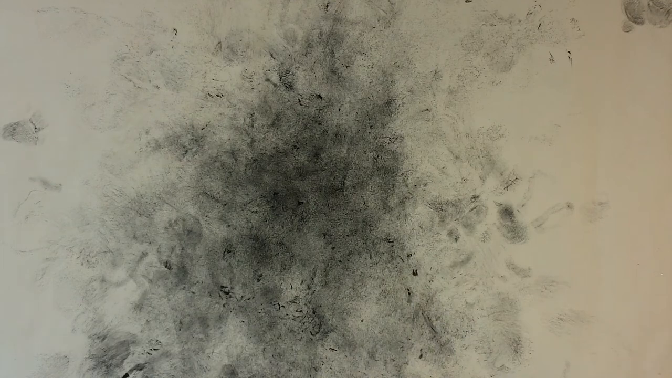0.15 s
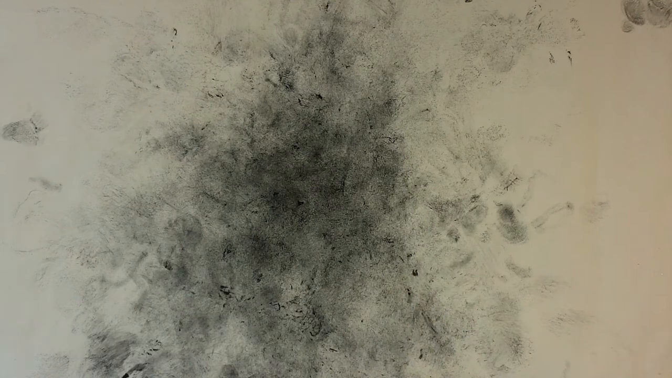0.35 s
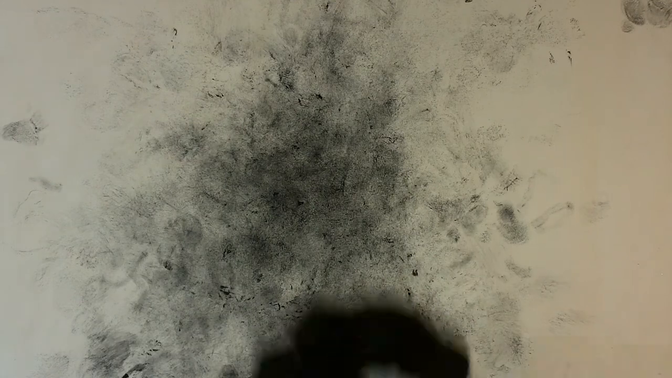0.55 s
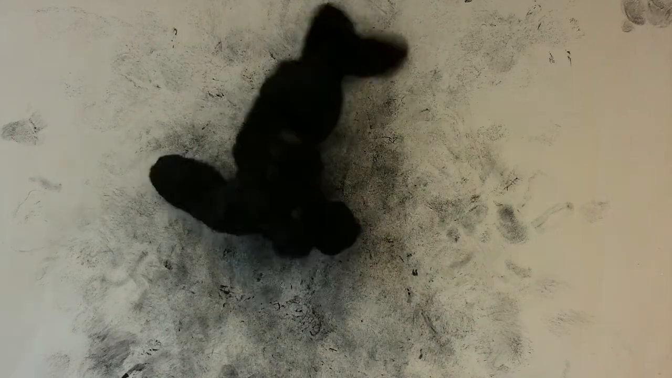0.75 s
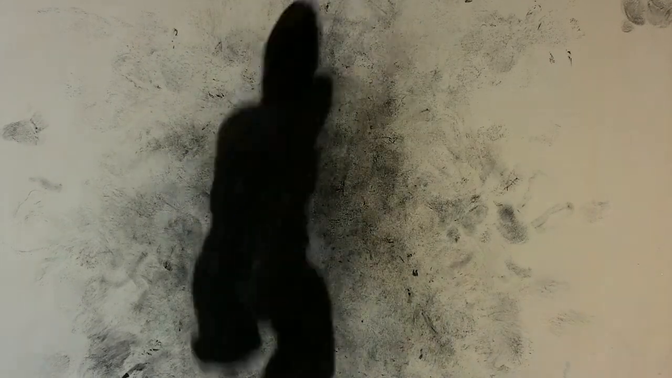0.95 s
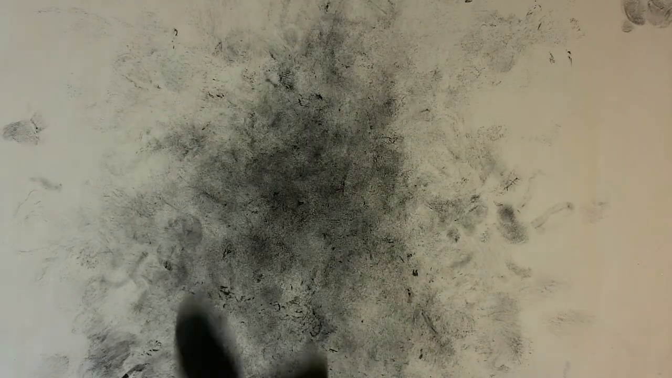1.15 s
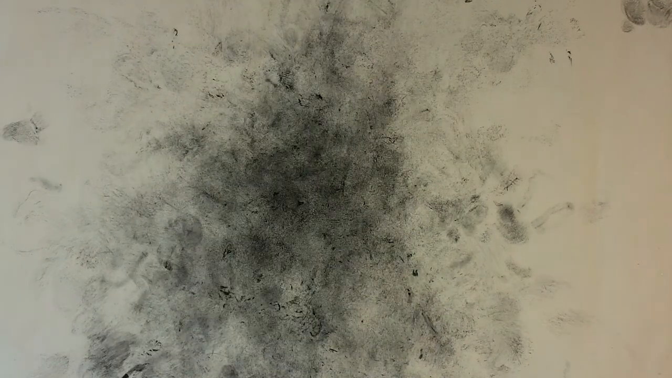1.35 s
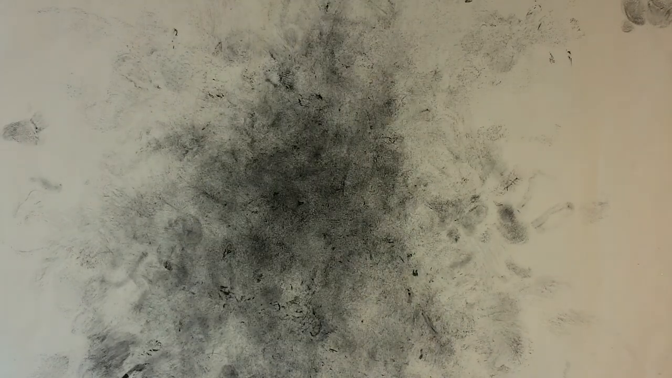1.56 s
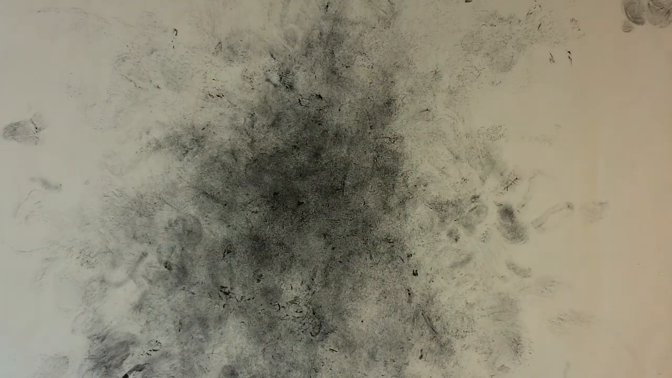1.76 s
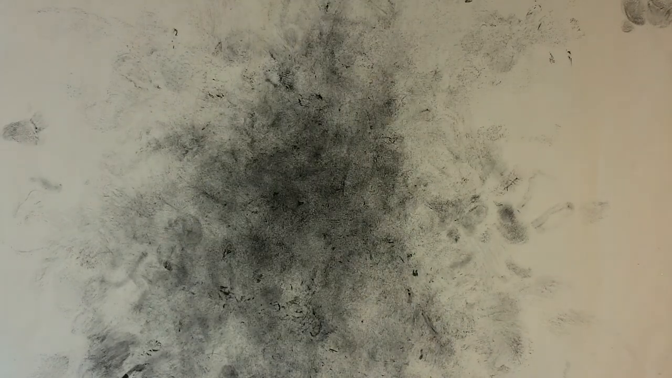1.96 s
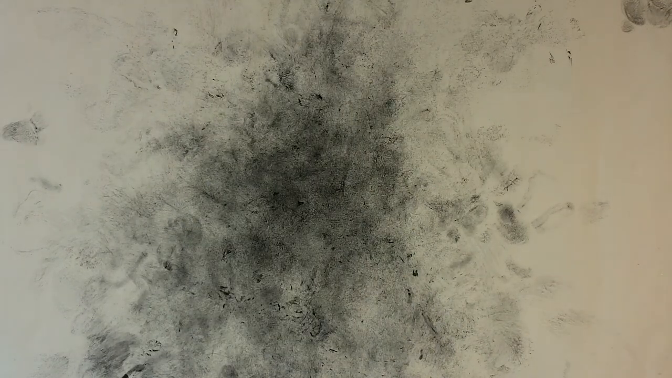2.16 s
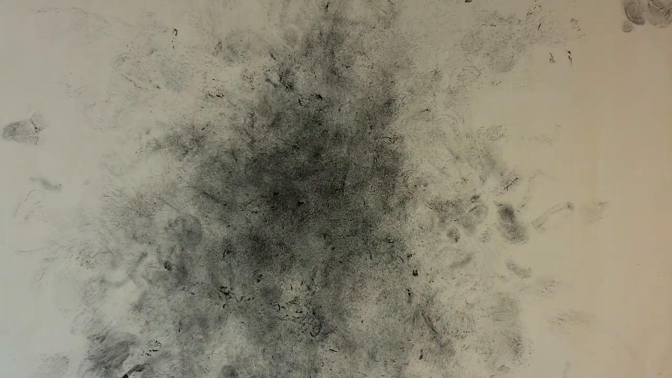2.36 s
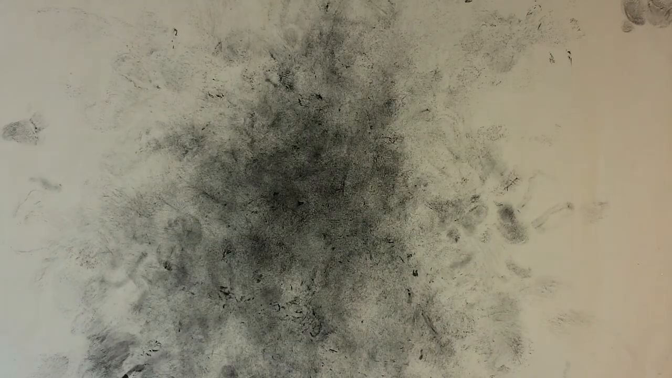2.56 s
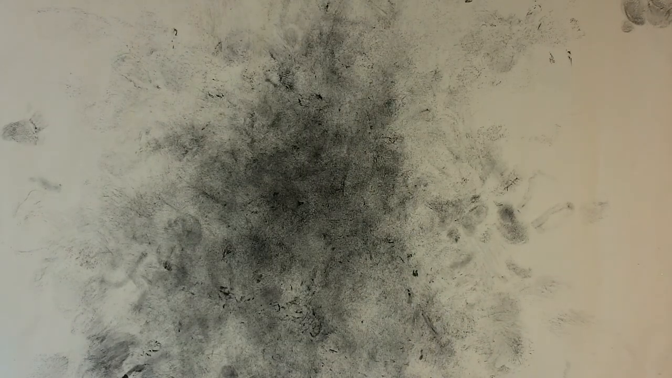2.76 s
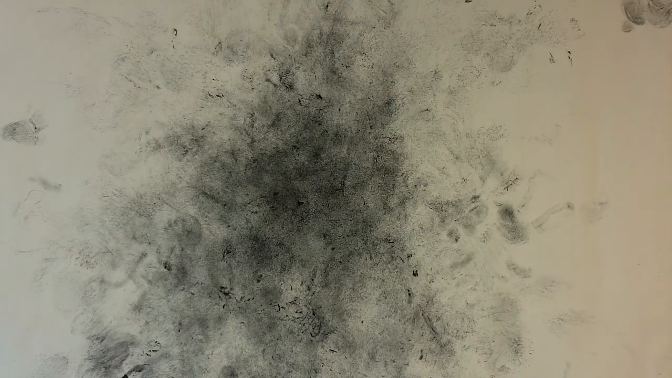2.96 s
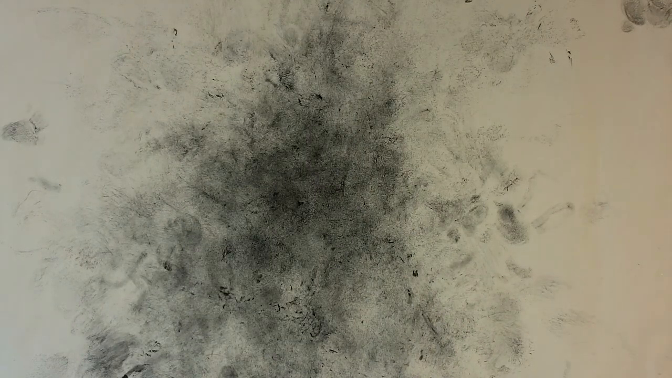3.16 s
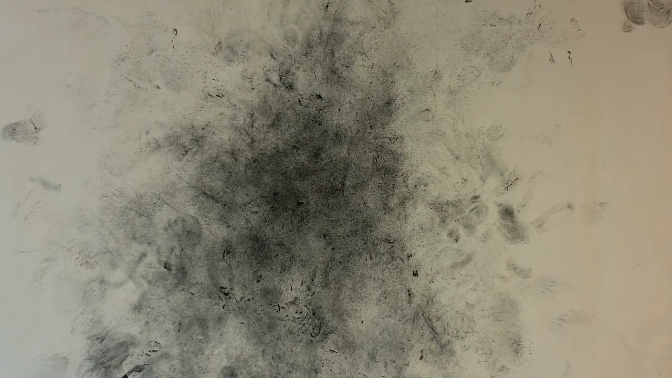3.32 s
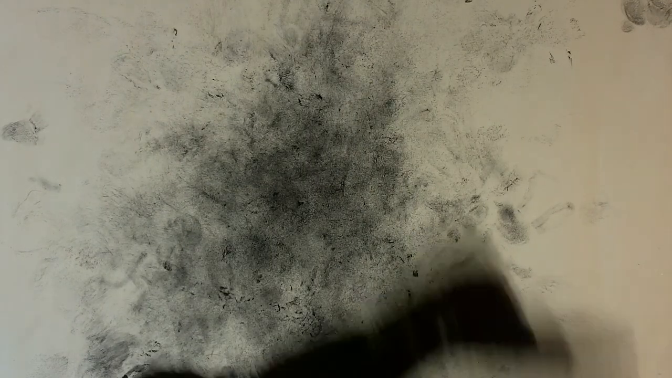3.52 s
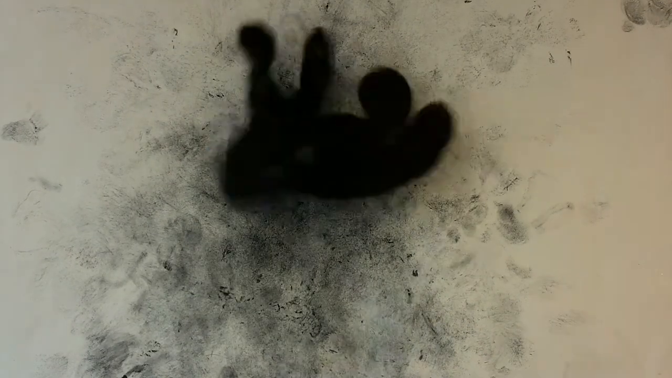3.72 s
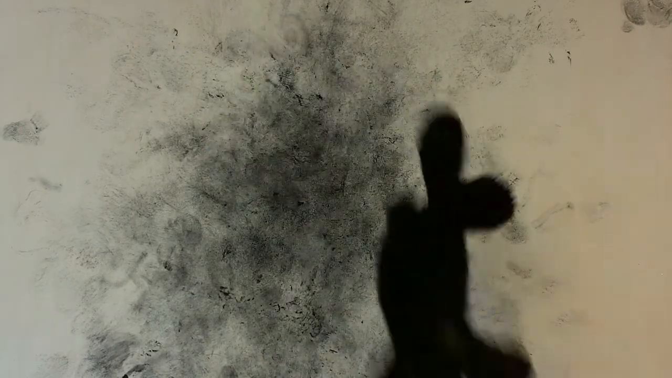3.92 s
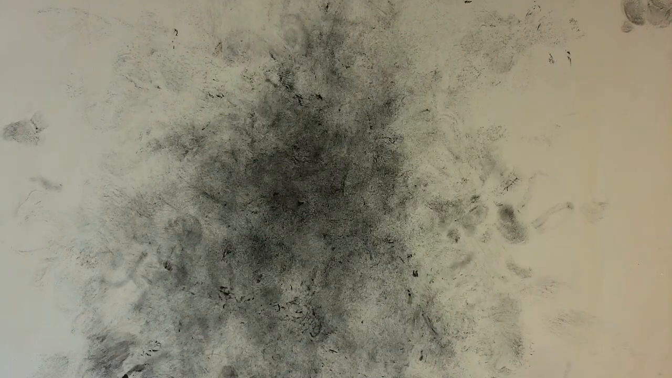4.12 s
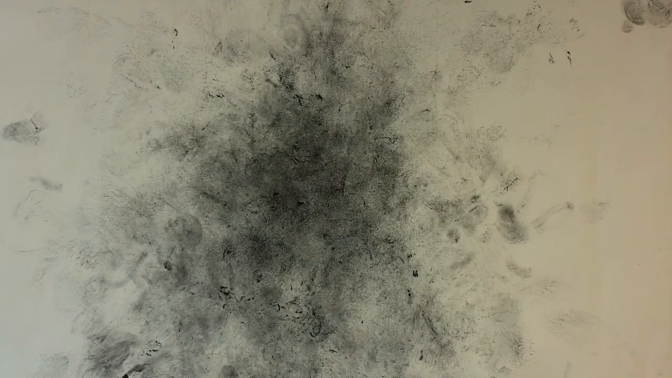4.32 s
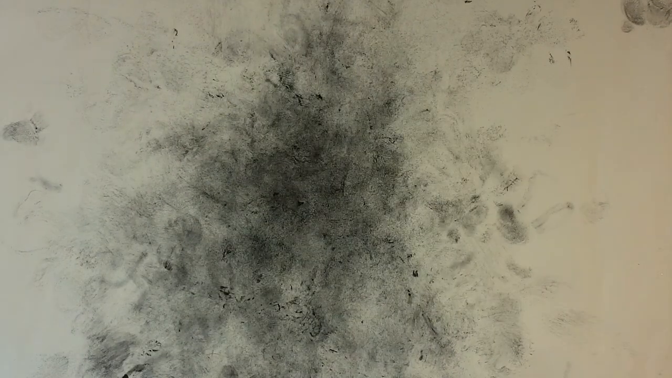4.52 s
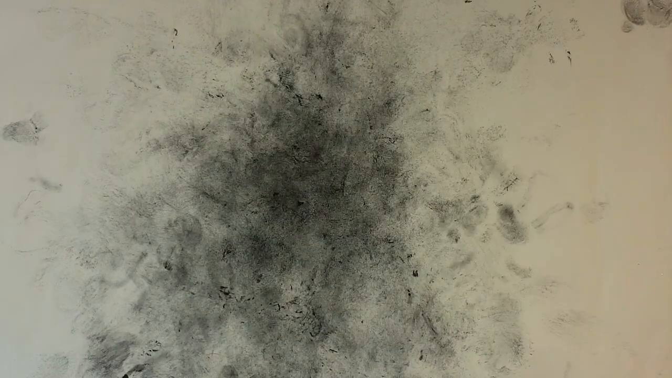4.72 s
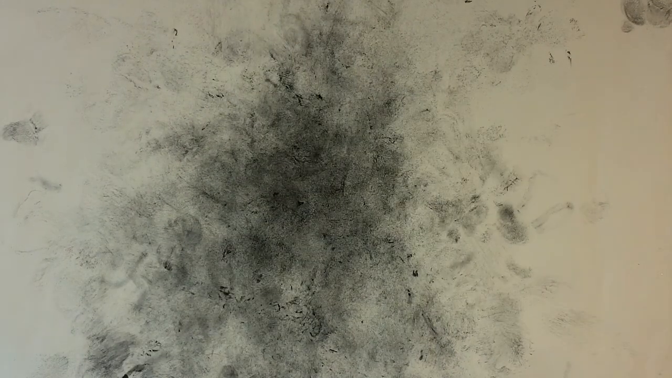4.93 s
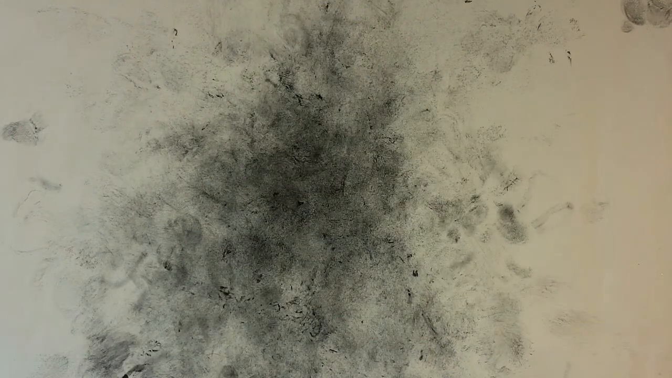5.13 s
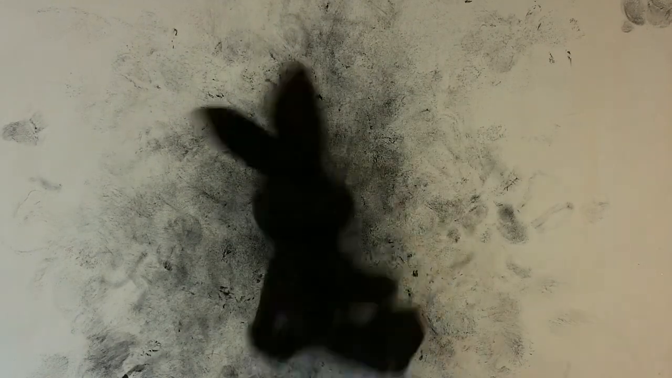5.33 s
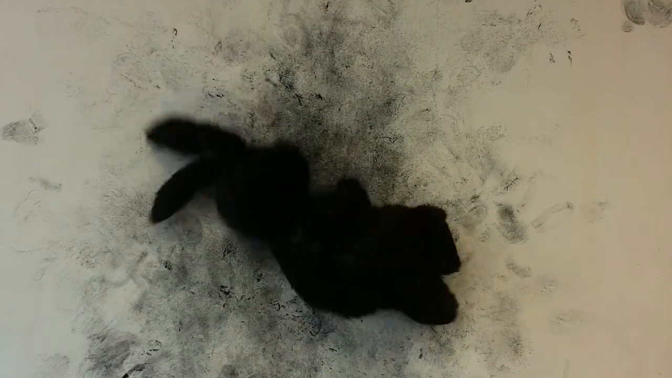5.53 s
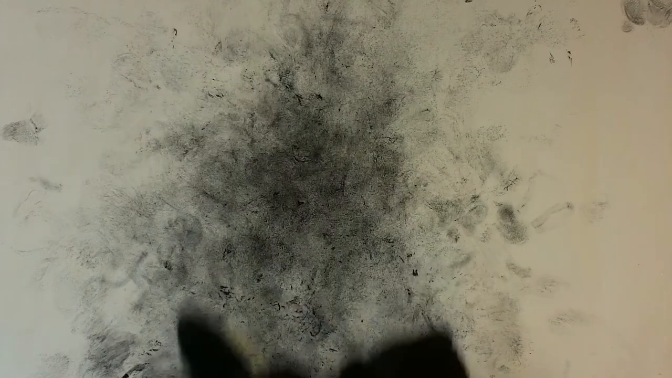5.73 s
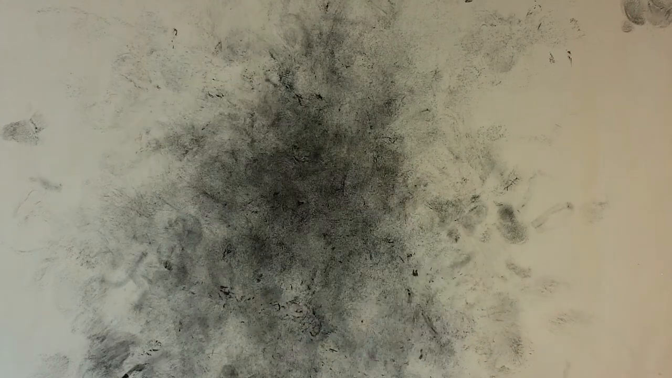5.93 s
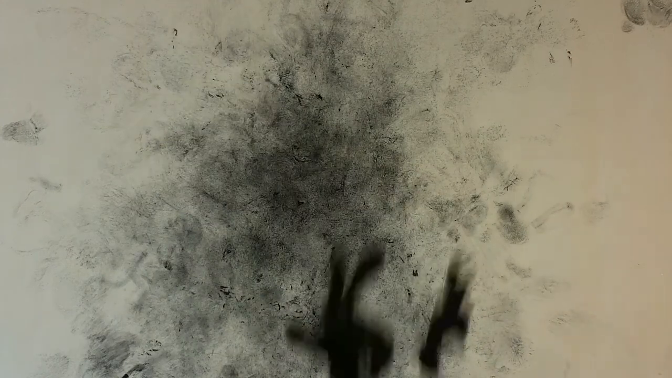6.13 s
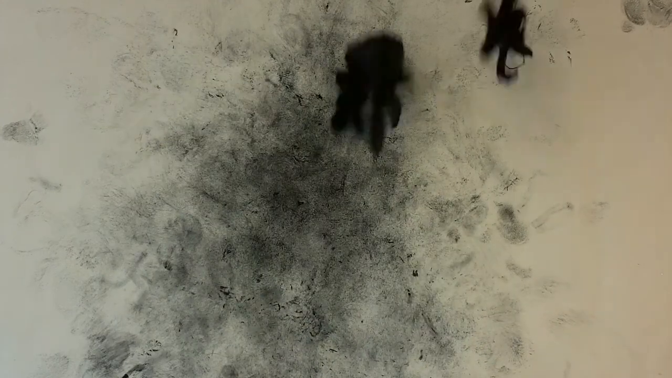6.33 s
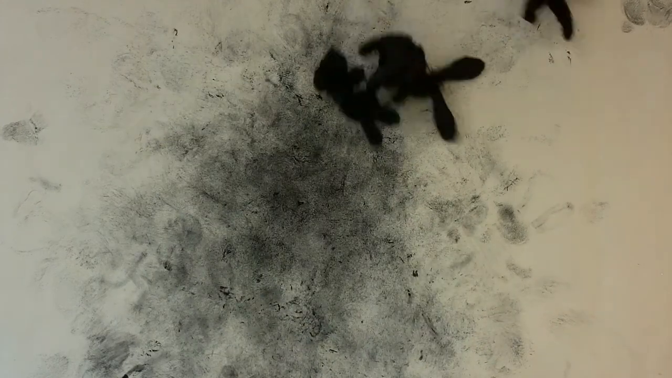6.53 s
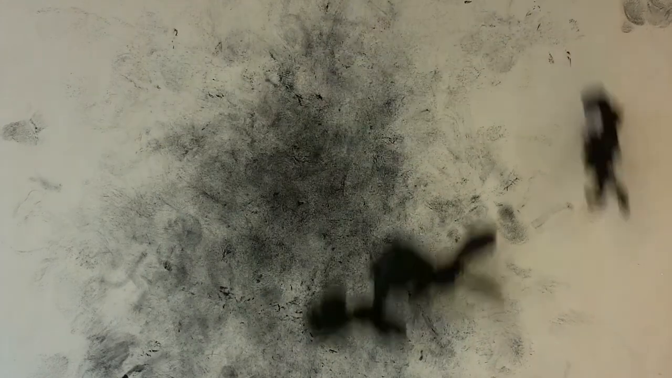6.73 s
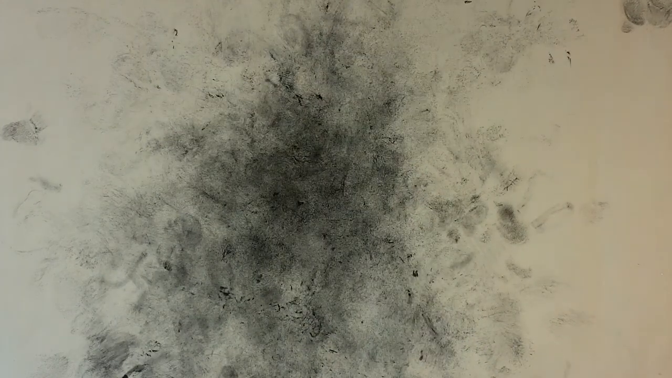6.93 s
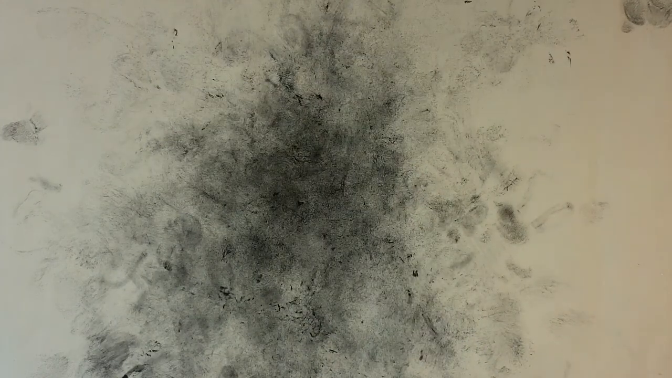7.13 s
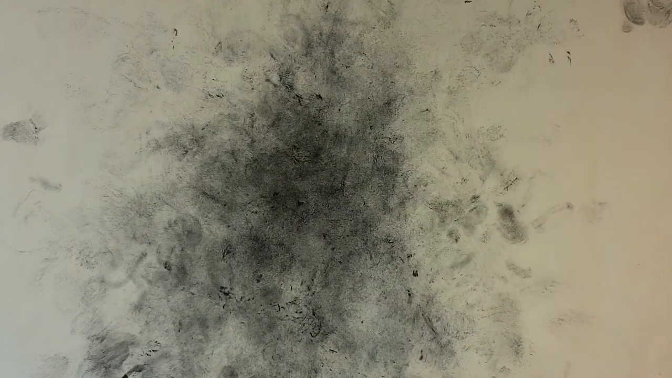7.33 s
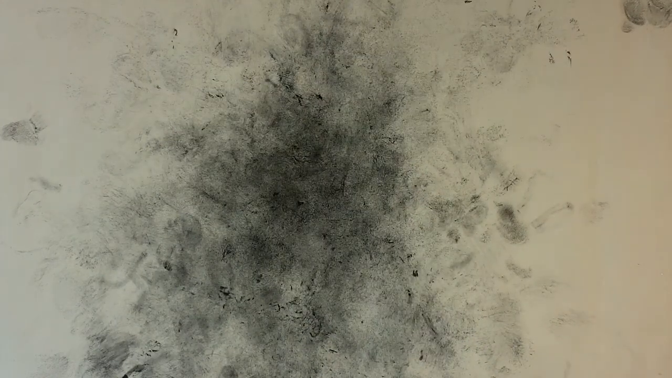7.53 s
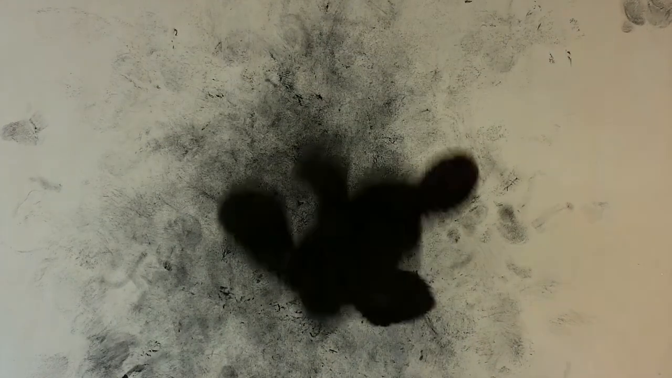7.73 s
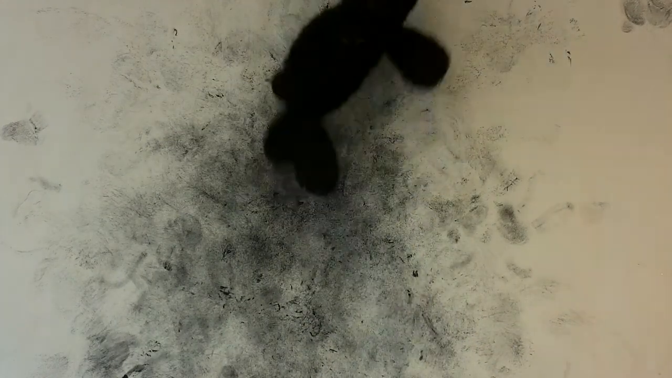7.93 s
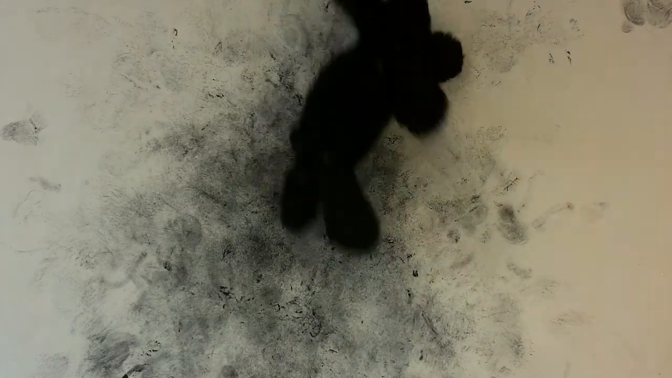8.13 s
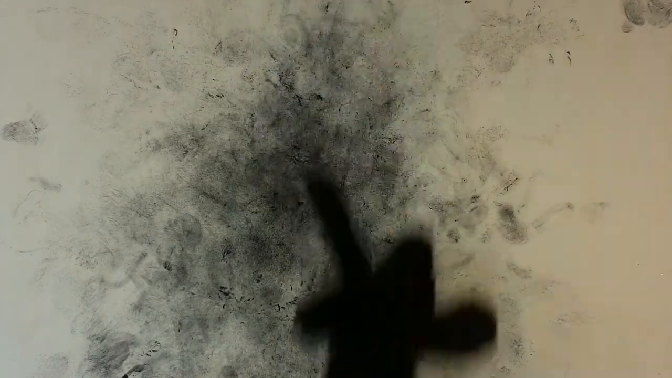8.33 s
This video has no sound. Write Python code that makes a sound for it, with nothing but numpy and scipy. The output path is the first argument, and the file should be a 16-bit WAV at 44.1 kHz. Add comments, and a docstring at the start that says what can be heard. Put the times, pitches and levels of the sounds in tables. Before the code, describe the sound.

A light bump and scuff on paper open the scene. From about 0.5 to 0.9 seconds, a plush toy brushes and lands on a big sheet on a hard floor, with dull slaps and crackles. Faint furry scuffs and paper ticks follow until a sharp paper snap at 3.3 seconds. The loudest landing comes at 3.8 seconds, a quick flurry of soft slaps, thuds and crackling. Another toy lands at 5.5 seconds with a hollow bump, followed by a snap. Lighter landings and snaps cluster around 6.5 seconds. From 7 to 7.6 seconds, fur drags across the sheet, which buckles with snaps, bumps and brief squeaky scuffs. A last toy flops down at about 8.1 seconds and slides. Everything has the short echo of a small bare room, over a steady low rumble and faint microphone hiss.

```python
"""Dull, soft slaps and crackling paper: plush toy rabbits are tossed one after another onto a big sheet
on a hard floor, and dragged off again. Each lands limb by limb, its weight thudding under the slap.
Fur scuffs across the sheet, which snaps as it buckles and resonates briefly in hollow bumps and squeaks.
A small bare room answers, over a low rumble and the hiss of a small microphone."""
import sys
import numpy as np
from scipy import signal
from scipy.fft import rfft, irfft
from scipy.io import wavfile

SR = 44100
rng = np.random.default_rng(int(sys.argv[2]) if len(sys.argv) > 2 else 0)


def waveform_to_disk(signal):
    """Save audio, clipped to [-1, 1], as 16-bit WAV at the path in sys.argv[1]."""
    frames = np.transpose(np.atleast_2d(signal))
    scaled = np.clip(frames, -1, 1) * 32767
    samples = np.round(scaled).astype(np.int16)
    wavfile.write(sys.argv[1], SR, samples)


N = 369356
TIME = np.arange(N) / SR

# Cue lists; their levels are relative, ahead of the trims in scene().
# fur slides on paper: start_s, speed_up_s, slow_down_s, rub_db, drag_db
FUR_STROKES = [(0.0, 0.0017, 0.096, -36, -43), (0.04, 0.11, 0.13, -43.5, -54), (0.484, .005, .06, -28, -39),
               (0.49, 0.055, 0.086, -25.5, -38), (0.788, 0.038, .12, -31, -26.5),
               (1.0, 0.098, 0.15, -60, -56.5), (1.425, .01, 0.057, -61, -50.5),
               (1.48, 0.068, 0.061, -50, -48.5), (1.65, 0.045, 0.036, -47.5, -49),
               (1.85, 0.033, .04, -53, -68), (1.93, .11, .13, -45.5, -48), (2.13, 0.017, 0.1, -46, -58),
               (2.29, .01, .14, -56, -59), (2.43, 0.062, 0.066, -47, -45.5), (2.68, 0.065, 0.037, -49, -60),
               (3.4, 0.087, 0.18, -55, -57), (3.61, 0.082, 0.056, -43, -48.5),
               (3.88, 0.014, 0.11, -39.5, -41.5), (4.1, 0.12, 0.15, -55, -55),
               (4.359, 0.029, 0.026, -50, -41), (5.15, 0.015, 0.14, -51, -59), (5.3, 0.033, 0.11, -55, -61),
               (5.58, 0.023, 0.11, -42.5, -36.5), (5.68, 0.017, 0.12, -44, -55),
               (5.8, 0.22, .12, -54.5, -55.5), (6.06, 0.092, 0.14, -43, -45.5),
               (6.3, 0.076, 0.051, -48.5, -53), (6.441, 0.017, 0.081, -29.5, -32),
               (6.53, 0.044, 0.057, -33, -36), (6.6, 0.076, 0.038, -38, -63),
               (7.089, 0.035, 0.078, -41, -44.5), (7.18, 0.056, .15, -39.5, -37),
               (7.29, 0.2, 0.076, -31.5, -41), (7.575, 0.01, 0.061, -39.5, -42.5),
               (7.955, .02, 0.085, -38.5, -47.5), (8.17, 0.086, .3, -41, -40.5)]
# the sheet sounds briefly at one pitch: peak_s, pitch_hz, level_db
SHEET_RESONANCES = [(0.553, 477, -35.5), (0.847, 910, -30), (1.444, 467, -49.5), (1.693, 456, -47.5),
                    (2.0, 480, -45.5), (2.301, 460, -52.5), (3.296, 433, -44.5), (5.557, 227, -34),
                    (5.56, 940, -29), (6.579, 1870, -29), (7.152, 550, -42.5), (7.177, 285, -39.5),
                    (7.315, 1160, -35.5), (7.372, 1600, -36), (7.426, 1100, -36), (7.486, 520, -35.5),
                    (7.584, 3190, -31.5), (7.968, 1560, -40.5), (8.066, 910, -29), (8.124, 780, -33)]
# the sheet snaps or is tapped: start_s, snap_db, knock_db, crisp_db
PAPER_SNAPS = [(0.041, -32.5, -42.5, -53), (0.4842, -31, -36, -67), (0.717, -33.5, -46, -68),
               (0.794, -35, -48, -51), (0.901, -33.5, -34, -56), (1.074, -39.5, -52, -64),
               (1.429, -43.5, -64, -78), (1.7268, -39, -63, -64), (2.7446, -42, -54, -76),
               (3.0465, -45.5, -49.5, -79), (3.2802, -15, -36, -40), (3.45, -54, -51, -78),
               (3.779, -29, -40, -53), (4.18, -56, -64, -68), (4.394, -41, -51, -59.5),
               (5.058, -52, -52, -79), (5.4138, -39, -52, -77), (5.692, -24, -31.5, -55),
               (6.442, -22.5, -31.5, -46), (6.5299, -27.5, -36, -51), (6.5748, -28, -31.5, -60),
               (6.662, -41, -42, -61), (7.075, -52, -48, -78), (7.154, -27.5, -38, -65),
               (7.171, -39, -44, -65), (7.2459, -35, -34.5, -72), (7.376, -31, -38, -61),
               (7.425, -38, -49, -60), (7.488, -26, -29, -61), (7.831, -44.5, -67, -70),
               (7.957, -53, -50, -72), (8.138, -33, -40, -51)]
# a body or limb lands: start_s, slap_db, thud_db, crackle_db
TOY_LANDINGS = [(0.002, -38, -36, -62), (0.546, -28.5, -29.5, -50), (0.778, -29, -35, -32.5),
                (0.783, -22.5, -48, -45), (0.806, -27, -48, -34), (0.873, -25.5, -33, -47),
                (0.917, -30.5, -38, -50), (3.773, -11, -28.5, -10.5), (3.786, -12, -28, -23),
                (3.795, -15, -20.5, -17.5), (3.805, -10, -34, -30), (3.828, -18, -20, -23),
                (3.842, -17.5, -33, -14.5), (3.859, -17, -22.5, -25), (3.878, -19, -36, -21.5),
                (5.497, -34.5, -58, -35), (5.512, -21, -28, -42), (5.521, -15.5, -36, -36),
                (5.529, -16, -41, -27.5), (5.557, -21.5, -27, -29), (6.438, -26.5, -42, -28),
                (6.461, -33.5, -29.5, -46), (6.548, -25, -33.5, -29), (6.574, -25, -29, -32),
                (8.041, -26.5, -31.5, -30.5), (8.061, -24.5, -33, -35), (8.096, -23.5, -26.5, -22.5),
                (8.126, -25.5, -27.5, -32)]

# Tone curves, one for each layer: frequency_hz, relative_gain_db
RUMBLE_EQ = [(15, 2), (40, 0.5), (62, 0.5), (80, -2.5), (97, 0.5), (125, -10.5), (170, -5.5), (215, -8),
             (245, -12), (275, -23), (320, -17), (450, -26), (1000, -34), (3000, -54)]     # the building's low end
HISS_EQ = [(300, 2.5), (1000, -4), (3300, 1), (4800, 6.5), (5300, -3.5), (8000, -19), (15000, -15.5)]         # microphone self-noise
RUB_EQ = [(300, -23), (1200, -11.5), (2100, -1.5), (3300, 2), (4800, 4), (5200, -4), (6500, -12),
          (8000, -27.5), (9700, -24), (11500, -22.5), (15000, -40)]           # bright brush of fibres
DRAG_EQ = [(100, -13.5), (200, 1), (280, 4), (350, -1.5), (460, -1), (700, -1.5), (1050, -5), (1600, -6.5),
           (3000, -15.5), (8000, -42.5)]         # dull pull of the toy's weight
SNAP_EQ = [(300, -8.5), (1500, -16), (3000, 1), (4700, 10), (5300, -1.5), (6600, -6), (8000, -18),
           (9700, -29), (11500, -22), (15000, -39)]         # paper buckling
CRISP_EQ = [(2000, -33), (5000, 9), (7000, 16), (11500, 7), (15000, -17)]       # the snap's airy edge
KNOCK_EQ = [(80, -33), (250, 2), (450, -7.5), (700, 1), (1100, 4), (2000, 5), (3000, 4.5), (5000, -36),
            (15000, -68)]       # paper tapping the floor
SLAP_EQ = [(100, -23), (300, -12.5), (480, -5), (620, -5), (800, -1.5), (1050, 0.5), (1400, -1),
           (2100, -4.5), (3000, -10.5), (5000, -19.5), (8000, -52), (15000, -60)]         # midrange smack of plush
THUD_EQ = [(50, -9), (130, -8.5), (195, -8), (270, -2.5), (340, -5.5), (450, -5.5), (600, -3), (900, -25.5),
           (2000, -35), (8000, -69)]         # the weight coming down
CRACKLE_EQ = [(400, -51.5), (1300, -8.5), (2200, 6), (3200, 5), (4700, 5.5), (5100, -5), (6500, -12.5),
              (8000, -31.5), (9700, -26.5), (11500, -27), (15000, -40)]   # paper creasing under a toy

# the room's decay: frequency_hz, t60_s
ROOM_DECAY = [(150, 0.55), (500, 0.36), (1200, 0.35), (3000, 0.43), (6000, 0.37), (14000, 0.34)]
# narrow dips in the microphone's response: centre_hz, width_hz
MIC_NOTCHES = [(4200, 910), (7870, 1020), (8800, 790), (12600, 510)]


def from_db(db):
    """Decibels to gain."""
    return 10 ** (np.asarray(db) / 20)


def at_hz(curve, hz):
    """Read a curve along a log-frequency axis."""
    knots, values = np.transpose(curve)
    return np.interp(np.log(np.maximum(hz, 1)), np.log(knots), values)


def colour(x, eq, size=8192):
    """Minimum-phase EQ: nothing rings ahead of an attack, and white noise keeps its power."""
    bins_hz = np.arange(size // 2 + 1) * SR / size
    cepstrum = irfft(np.log(from_db(at_hz(eq, bins_hz))))
    cepstrum[1:size // 2] *= 2
    cepstrum[size // 2 + 1:] = 0
    response = irfft(np.exp(rfft(cepstrum)))[:size // 2]
    return signal.fftconvolve(x, response / np.linalg.norm(response))[:N]


def grains(per_s, spread_db):
    """Gritty texture: tiny contacts at random moments and of uneven size; rms 1."""
    sizes = from_db(spread_db * np.minimum(rng.exponential(1, N), 4))
    clicks = (rng.random(N) < per_s / SR) * sizes * rng.choice([-1, 1], N)
    return clicks / np.sqrt(np.mean(clicks ** 2))


def blows(starts_s, levels_db, decay_s):
    """Envelope of a series of blows: instant attack, exponential decay; their powers add."""
    power = np.zeros(N)
    for start_s, level_db in zip(starts_s, levels_db):
        start = round(start_s * SR)
        age = TIME[:min(SR // 3, N - start)]
        power[start:start + len(age)] += (from_db(level_db) * np.exp(-age / decay_s)) ** 2
    return np.sqrt(power)


def background(rumble_db, hiss_db):
    """The bed: the building rumbles in the room's low resonances, and the microphone hisses."""
    rumble, hiss = rng.standard_normal((2, N))
    return from_db(rumble_db) * colour(rumble, RUMBLE_EQ) + from_db(hiss_db) * colour(hiss, HISS_EQ)


def room(x, wet_db, first_echo_s, early_db, early_s, place_s, places=7):
    """Dense echoes off near walls; their pattern shifts as the toys move from place to place."""
    age = TIME[:SR * 3 // 4]
    tails = 0
    for hz in 110 * 2. ** np.arange(8):
        octave = signal.butter(2, [hz / np.sqrt(2), hz * np.sqrt(2)], "band", fs=SR, output="sos")
        wash = signal.sosfilt(octave, rng.standard_normal((places, len(age))))
        tails += wash * from_db(-60 * age / at_hz(ROOM_DECAY, hz))
    onset = np.clip(age / first_echo_s - 1, 0, 1)
    early_lift = from_db(early_db * np.exp(-age / early_s))   # the nearest surfaces answer loudest
    echoes = 0
    for place, tail in enumerate(tails * onset * early_lift):
        away = np.abs((TIME / place_s - place + places / 2) % places - places / 2)
        share = np.sqrt(np.clip(1 - away, 0, 1))   # equal-power cross-fade, cycling through the tails
        echoes += signal.oaconvolve(x * share, tail / np.linalg.norm(tail))[:N]
    return x + from_db(wet_db) * echoes


def fur_slides(rub_trim_db, drag_trim_db, stir_db=-66):
    """Fibres catch and slip on the paper's grain; the weight behind them gives slower, duller slips."""
    rub_level = drag_level = from_db(stir_db)   # fur stirs faintly between strokes
    for start_s, speed_up_s, slow_down_s, rub_db, drag_db in FUR_STROKES:
        peak_s = start_s + speed_up_s
        speed = np.interp(TIME, [start_s, peak_s, peak_s + slow_down_s], [0, 1, 0])
        friction = speed ** 0.82   # faster is louder
        rub_level = np.hypot(rub_level, friction * from_db(rub_db + rub_trim_db))
        drag_level = np.hypot(drag_level, friction * from_db(drag_db + drag_trim_db))
    rub = rub_level * grains(per_s=4000, spread_db=3.5)
    drag = drag_level * grains(per_s=900, spread_db=4.5)
    return colour(rub, RUB_EQ) + colour(drag, DRAG_EQ)


def sheet_resonances(trim_db, q=3.3):
    """Hollow bumps, knocks, thuds and squeaky scuffs: a broad resonance of the sheet swells and fades."""
    out = np.zeros(N)
    contacts = grains(per_s=2400, spread_db=-1.5)
    for peak_s, pitch_hz, level_db in SHEET_RESONANCES:
        near = np.abs(TIME - peak_s) < 0.12
        edges_hz = pitch_hz * np.exp(np.array([-0.5, 0.5]) / q)
        ring = signal.sosfilt(signal.butter(2, edges_hz, "band", fs=SR, output="sos"), contacts[near])
        half_length_s = 0.0096 * (1000 / pitch_hz) ** 0.61   # low ones last longer
        swell = np.exp(-0.5 * ((TIME[near] - peak_s) / half_length_s) ** 2)
        ring_rms = np.sqrt(np.average(ring ** 2, weights=swell ** 2))
        out[near] += from_db(level_db + trim_db) * swell * ring / ring_rms
    return out


def paper_snaps(snap_trim_db, knock_trim_db, crisp_trim_db, snap_decay_s=0.0028, crisp_decay_s=0.0091):
    """The sheet buckles or is flicked against the floor: a tight, bright burst with a little knock."""
    starts_s, snap_db, knock_db, crisp_db = np.transpose(PAPER_SNAPS)
    creases = grains(per_s=14000, spread_db=0.4)
    snap = blows(starts_s, snap_db + snap_trim_db, snap_decay_s) * creases
    crisp = blows(starts_s, crisp_db + crisp_trim_db, crisp_decay_s) * creases
    knock = blows(starts_s, knock_db + knock_trim_db, snap_decay_s) * rng.standard_normal(N)
    return colour(snap, SNAP_EQ) + colour(crisp, CRISP_EQ) + colour(knock, KNOCK_EQ)


def toy_landings(slap_trim_db, thud_trim_db, crackle_trim_db, decay_s=0.011, thud_decay_s=0.022):
    """A soft body lands in a flurry of small contacts: plush slaps, weight thuds, paper creases."""
    starts_s, slap_db, thud_db, crackle_db = np.transpose(TOY_LANDINGS)
    slap = blows(starts_s, slap_db + slap_trim_db, decay_s) * grains(per_s=9000, spread_db=1.5)
    thud = blows(starts_s, thud_db + thud_trim_db, thud_decay_s) * grains(per_s=5000, spread_db=0.5)
    crackle = blows(starts_s, crackle_db + crackle_trim_db, decay_s) * grains(per_s=9000, spread_db=3)
    return colour(slap, SLAP_EQ) + colour(thud, THUD_EQ) + colour(crackle, CRACKLE_EQ)


def scene():
    """The mono mix: toys and paper in the room, over a steady bed of rumble and hiss."""
    foley = toy_landings(slap_trim_db=-6, thud_trim_db=-8, crackle_trim_db=-4.5)
    foley += paper_snaps(snap_trim_db=-2, knock_trim_db=1.5, crisp_trim_db=1)
    foley += fur_slides(rub_trim_db=-6, drag_trim_db=-7) + sheet_resonances(trim_db=-6.5)
    in_room = room(foley, wet_db=-1, first_echo_s=0.0012, early_db=5.5, early_s=0.016, place_s=0.02)
    return (in_room + background(rumble_db=-48, hiss_db=-63))[None]


def record(dry):
    """The small microphone notches the treble; a steep low-pass takes off the very top."""
    for centre_hz, width_hz in MIC_NOTCHES:
        dry = signal.lfilter(*signal.iirnotch(centre_hz, centre_hz / width_hz, fs=SR), dry)
    cutoff_hz = 15350
    return signal.sosfilt(signal.ellip(10, 0.2, 70, cutoff_hz, fs=SR, output="sos"), dry)


dry = scene()
out = record(dry)
waveform_to_disk(out)
```